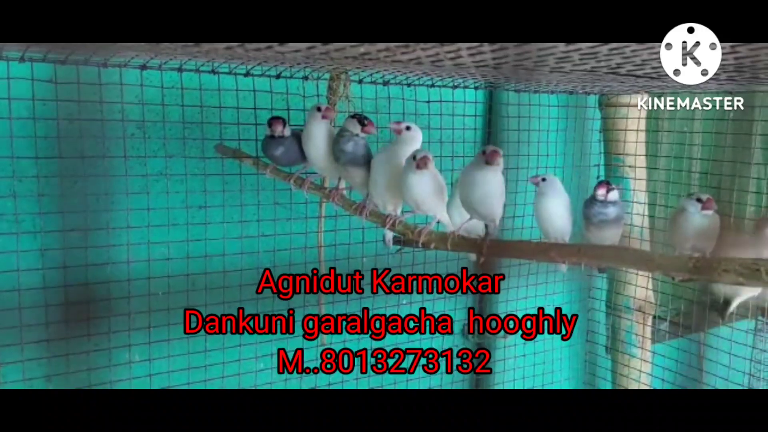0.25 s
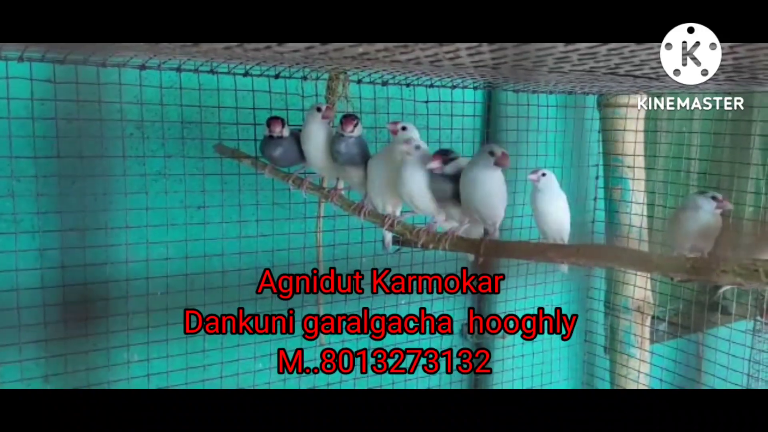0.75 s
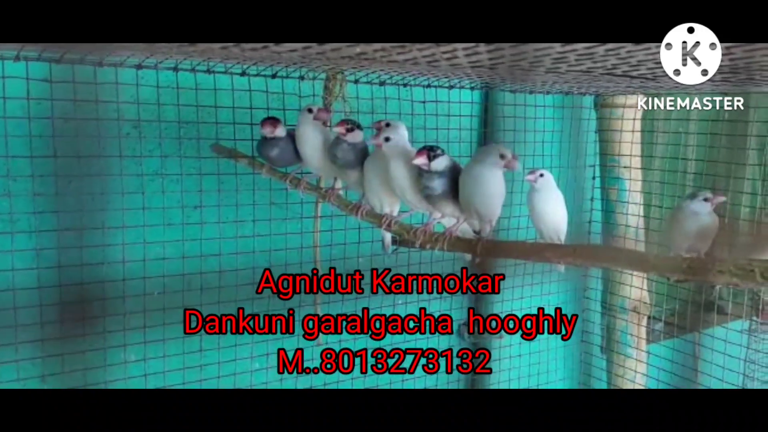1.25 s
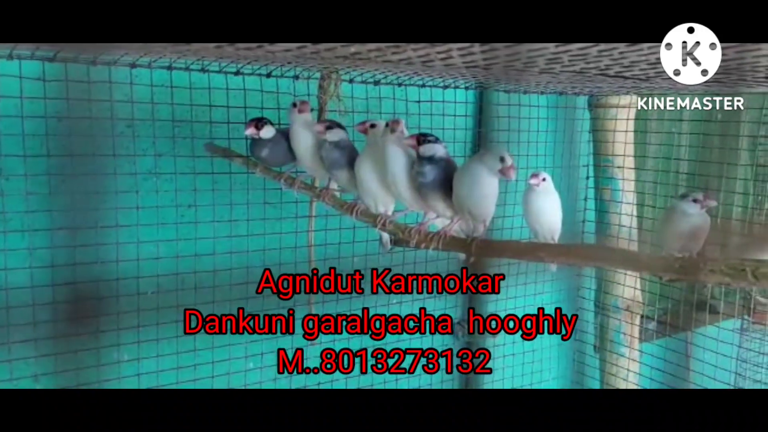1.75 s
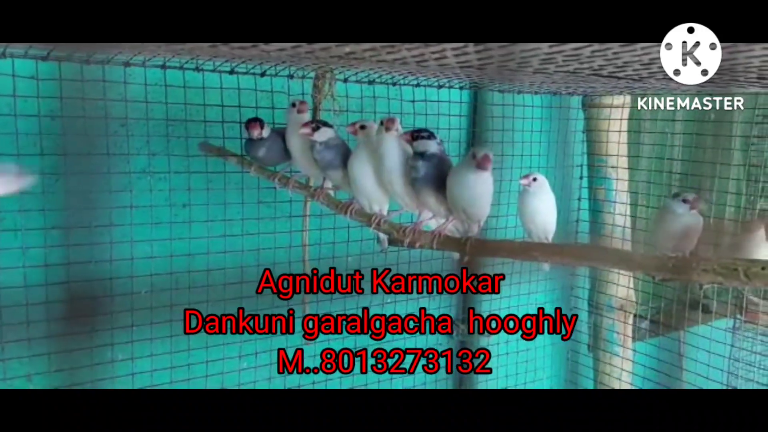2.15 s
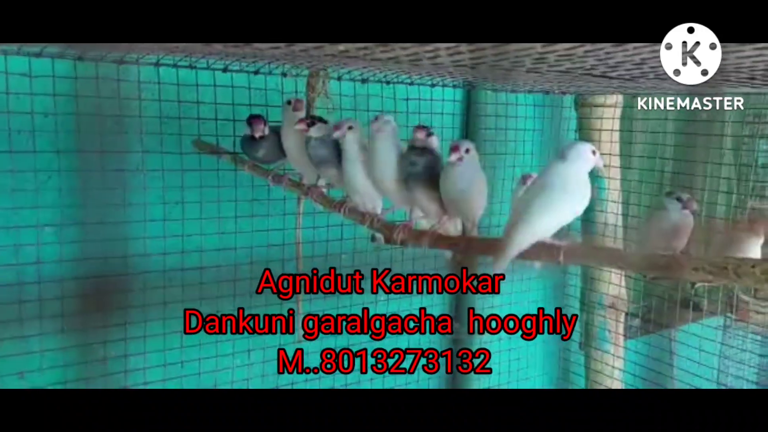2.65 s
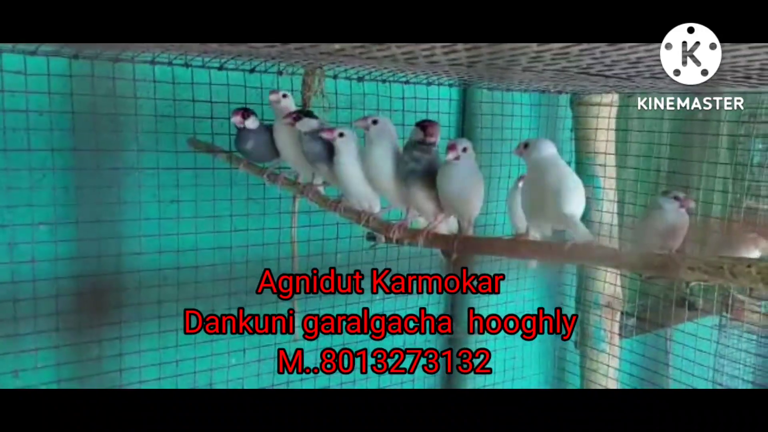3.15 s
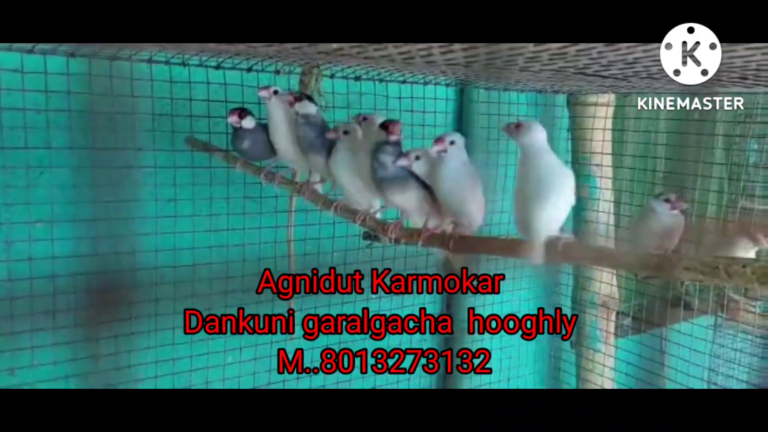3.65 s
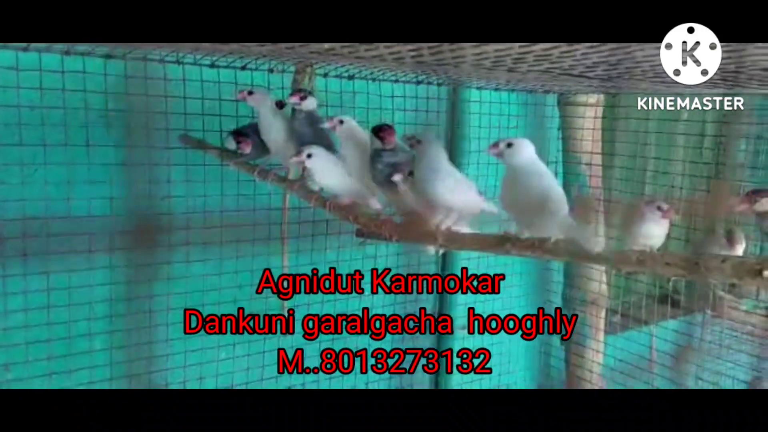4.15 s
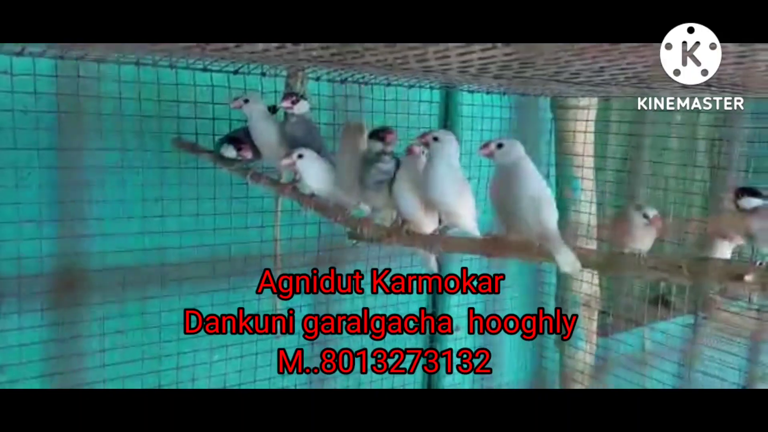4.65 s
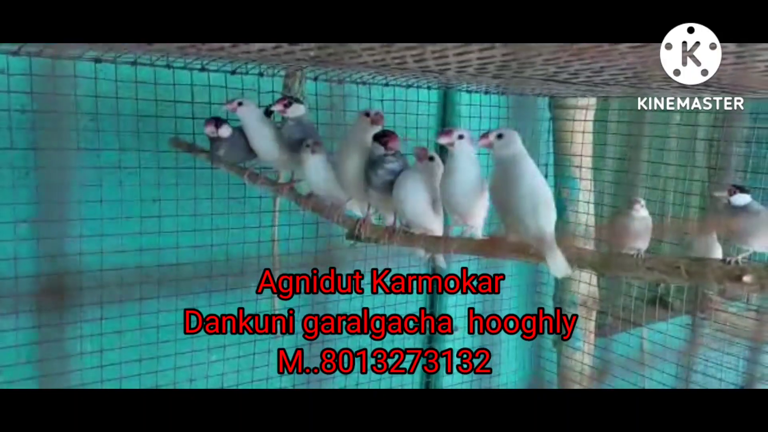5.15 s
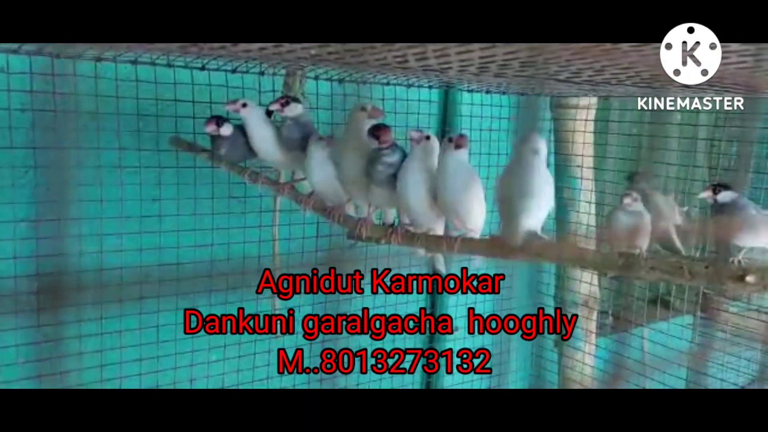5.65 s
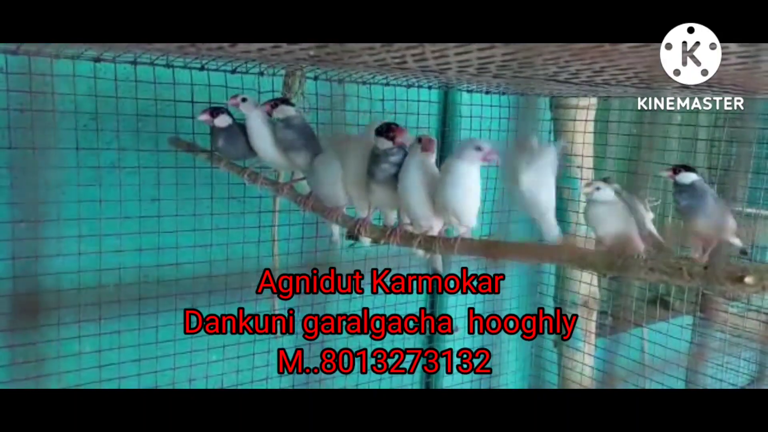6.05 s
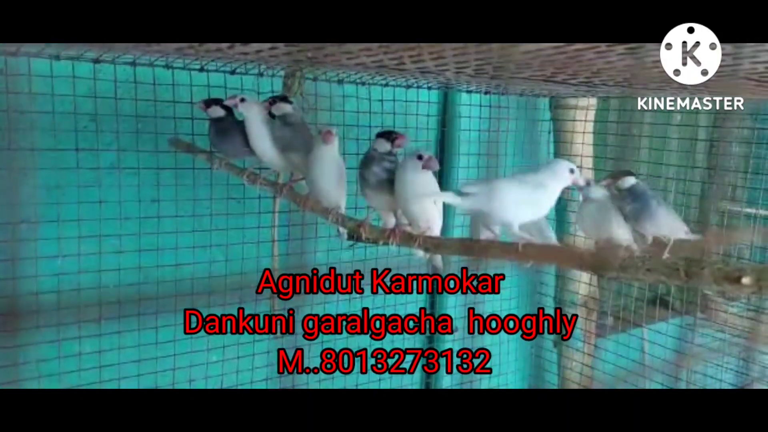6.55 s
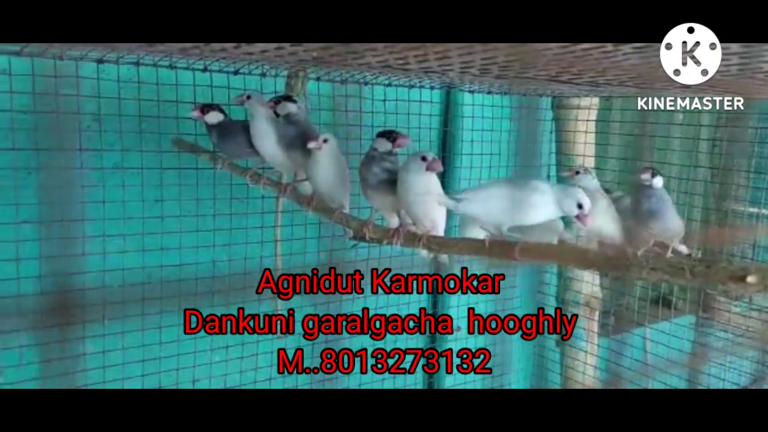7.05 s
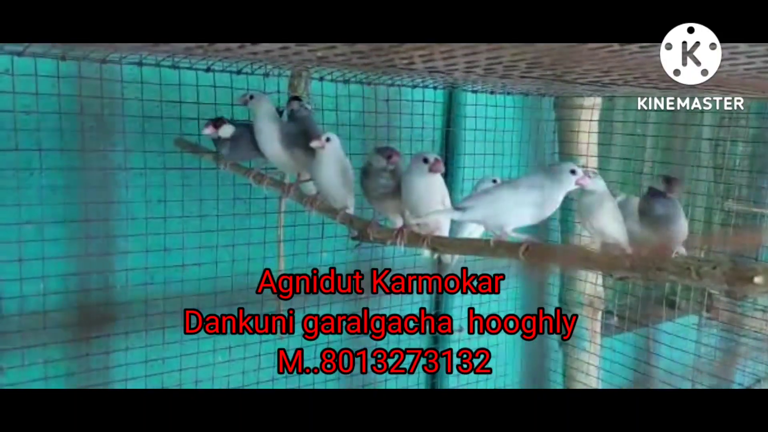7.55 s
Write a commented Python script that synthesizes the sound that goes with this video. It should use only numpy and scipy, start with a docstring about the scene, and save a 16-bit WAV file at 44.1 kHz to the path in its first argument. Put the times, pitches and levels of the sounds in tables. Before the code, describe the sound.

A hoarse rising bird whistle rings out, then many quick chips, ticks, raspy scolds and soft wingbeats fill a small cage over faint hum.

```python
"""A loud rising whistle rings out at once, over a faint low hum, in a small wire aviary full of finches.
Many short chips follow, with low voice ticks, wing flutters, nasal calls, whistles and raspy scolding.
The voices are stacks of overtones, coloured by a beak and shaken to sound rough.
Wing beats are soft low tones; feet, feathers and the farther flock are shaped noise.
Near walls answer every call."""
import sys
import numpy as np
from scipy import signal
from scipy.fft import rfft, irfft, next_fast_len
from scipy.io import wavfile
from scipy.ndimage import uniform_filter1d, map_coordinates

SR = 44100
rng = np.random.default_rng(int(sys.argv[2]) if len(sys.argv) > 2 else 0)


def persist_wave(psi):
    """Save psi, clipped to +-1, as 16-bit WAV."""
    counts = np.round(np.clip(psi, -1, 1) * 32767).astype(np.int16)
    wavfile.write(sys.argv[1], SR, np.atleast_2d(counts).T)


N = 343980  # length of the scene in samples
TOP_HZ = 15500  # nothing sounds above this


def amp(db):
    """Decibels to gain."""
    return 10 ** (np.asarray(db) / 20)


def unit(x):
    """Scale x to an rms (average strength) of 1."""
    return x / np.sqrt(np.mean(x ** 2) + 1e-20)


def along(points, hz):
    """Read a curve given as (f/Hz, value) points, joined by lines on a log frequency axis."""
    f, v = np.transpose(points)
    return np.interp(np.log(hz + 1), np.log(f + 1), v)


def wobble(rate, size):
    """A smooth random curve through `rate` random points a second."""
    knots = rng.standard_normal(4096)
    return map_coordinates(knots, [np.arange(size) * rate / SR], mode="wrap")


def trill(rate, size):
    """A swing between -1 and 1 at a slightly unsteady rate."""
    unsteady_rate = rate * (1 + .2 * wobble(rate, size))
    return np.sin(2 * np.pi * np.cumsum(unsteady_rate) / SR)


def filtered(x, response):
    """Make each frequency of x stronger or weaker, as response(hz) says."""
    m = next_fast_len(N + 8192)
    hz = np.fft.rfftfreq(m, 1 / SR)
    return irfft(rfft(x, m) * response(hz), m)[..., :N]


def noise(spectrum, side_db):
    """Stereo noise of rms 1; side_db sets how much left and right differ."""
    mid, side = filtered(rng.standard_normal((2, N)), lambda hz: amp(along(spectrum, hz)))
    side = amp(side_db) * side
    return unit(np.array([mid + side, mid - side]))


def patchy(x, depth_db):
    """Small patches of pitch and time swell and fade independently."""
    z = signal.stft(x, nperseg=256)[2]
    field = rng.standard_normal(z.shape[1:])
    field = uniform_filter1d(field, size=4, axis=0)
    field = uniform_filter1d(field, size=14, axis=1)
    patched = signal.istft(z * amp(depth_db * unit(field)), nperseg=256)[1]
    return unit(patched[:, :N])


def add(out, s, x, pan_db, lag_s=0):
    """Place a sound at s seconds; pan_db is left over right level, lag_s delays the right side."""
    gains = unit(amp([pan_db / 2, -pan_db / 2]))
    for channel, gain, delay in zip(out, gains, (0, lag_s)):
        start = max(int((s + delay) * SR), 0)
        part = channel[start:start + len(x)]
        part += gain * x[:len(part)]


def syrinx(pitch, rough, beak, jitter, flutter_db, jitter_hz, count):
    """Bird voice box: overtones shaped by throat and beak, near rms 1; roughness shakes pitch and strength."""
    size = len(pitch)
    shaken_pitch = pitch * (1 + jitter * rough * wobble(jitter_hz, size))
    phase = 2 * np.pi * np.cumsum(shaken_pitch) / SR
    k = np.arange(1, count + 1)[:, None]
    gains = amp(along(beak, k * pitch)) * (k * pitch < TOP_HZ)
    strength = np.sqrt((gains ** 2).sum(0) / 2 + 1e-12)
    tone = (gains * np.sin(k * phase)).sum(0) / strength
    return tone * unit(amp(flutter_db * rough * wobble(jitter_hz, size)))


# how loud the whole background is over time: (t/s, level/dB)
BACKGROUND_LEVEL = [(0, -49.5), (1.4, -53.5), (2.05, -41), (2.9, -55), (4.1, -42.5), (5.25, -46.5),
                    (6.1, -40.5), (7.8, -40)]
REFERENCE_DB = -50  # the background level at which the swell is 0 dB


def swell(s):
    """How many dB the background is above its reference level at s seconds."""
    return np.interp(s, *np.transpose(BACKGROUND_LEVEL)) - REFERENCE_DB


# tone colour of the hum: (f/Hz, level/dB)
HUM_COLOUR = [(25, -13), (90, 2), (180, -3.5), (260, -0.5), (350, -9.5), (900, -21.5), (2000, -52)]
# wavering tones in the hum, relative to its noise: (f/Hz, level/dB)
DRONE_TONES = [(87, -3.5), (146, -6)]
# tone colour of the farther flock: (f/Hz, level/dB)
FLOCK_COLOUR = [(500, -11.5), (1150, -3), (2400, 3.5), (3500, -6.5), (5000, -10), (8000, -19.5),
                (15000, -23.5)]
# tone colour of rustling feathers: (f/Hz, level/dB)
RUSTLE_COLOUR = [(400, -15), (7000, -8), (12500, 12), (15500, -63)]
HUM_DB, FLOCK_DB, RUSTLE_DB = -52.5, -50.5, -67.5  # levels at 0 dB swell
HUM_GROWS, RUSTLE_GROWS = 0.79, 0.96  # dB for each dB of swell


def background():
    """Low hum with wavering tones, blur of the farther flock and rustling feathers rise and fall together."""
    t = np.arange(N) / SR
    swell_db = swell(t)
    drone = np.zeros(N)
    for hz, db in DRONE_TONES:
        level = amp(db + 5.5 * wobble(30, N))
        drone += level * np.sin(2 * np.pi * hz * t + 0.84 * wobble(15, N))
    hum = amp(HUM_DB + HUM_GROWS * swell_db) * (noise(HUM_COLOUR, side_db=-11.0) + drone)
    flock = amp(FLOCK_DB + swell_db) * patchy(noise(FLOCK_COLOUR, side_db=-1), depth_db=4)
    rustle_db = RUSTLE_DB + RUSTLE_GROWS * swell_db
    rustle_db = rustle_db + 3.3 * wobble(26, N) + 1.6 * wobble(120, N)
    return hum + flock + amp(rustle_db) * noise(RUSTLE_COLOUR, side_db=2.0)


LOUD_LOW_HZ, LOUD_TOP_HZ = 1466, 3292  # the upward slide
SLIDE_BEND = .36  # softness of the slide, as a share of the time to mid-slide
CREST_S, SAG_HZ_PER_S = .145, 1750  # after the crest the pitch sinks steadily
TREMOR, TREMOR_PER_S = .024, 110  # trill that calms towards the end: share of the pitch, swings a second
HOOK_S, HOOK_HZ = .005, 700  # at the very end the pitch drops and the voice breaks up again
LOUD_RISE_DB, LOUD_FADE_DB_PER_S = 9, 24.5  # rise from the start to the peak, then fade
LOUD_PEAK_AT = 1.48  # when the level peaks, in mid-slide times
HOARSE, CLEAR = 0.678, 0.11  # roughness 0-1 at the foot and at the top of the slide
SECOND_TOP_HZ, SECOND_DB = 5440, -9.5  # second voice: pitch ceiling, level against the first at mid-slide
MELLOW_HZ = 5200  # towards the end the overtones above this die away
ONSET_S = 0.041  # soft start
# loud calls: (t/s, length/s, time to mid-slide/s, level/dB before a shared trim, extra treble/dB)
LOUD_CALLS = [(0.005, .308, .066, -10, 1), (2.185, .325, .054, -10.5, 5)]
# tone colour of the beak in loud calls: (f/Hz, level/dB)
LOUD_CALL_BEAK = [(1400, -5), (2200, -1.5), (3100, 8.5), (4300, 1), (5300, -4), (6000, -12), (9600, -23),
                  (13000, -27.5), (16000, -44)]


def loud_calls():
    """Two hoarse voices slide up together; the lower clears into a trilling whistle and hooks downward."""
    out = np.zeros((2, N))
    for s, length, slide_s, peak_db, treble_db in LOUD_CALLS:
        t = np.arange(int(length * SR)) / SR
        risen = 1 / (1 + np.exp((1 - t / slide_s) / SLIDE_BEND))  # 0 at the foot, 1 at the top
        hz = LOUD_LOW_HZ + (LOUD_TOP_HZ - LOUD_LOW_HZ) * risen
        hz = hz - SAG_HZ_PER_S * np.maximum(t - CREST_S, 0)
        hz = hz * (1 + TREMOR * (1 - (t / length) ** 2) * trill(TREMOR_PER_S, len(t)))
        hook = np.exp((t - length) / HOOK_S)
        peak_s = LOUD_PEAK_AT * slide_s
        below_db = LOUD_RISE_DB * (1 - t / peak_s)
        fade_db = LOUD_FADE_DB_PER_S * (t - peak_s)
        db = peak_db - np.maximum(below_db, fade_db)
        rough = HOARSE + (CLEAR - HOARSE) * risen ** 2 * (1 - hook)
        beak = [(f, level + treble_db * (f > 7000)) for f, level in LOUD_CALL_BEAK]
        first = syrinx(hz - HOOK_HZ * hook, rough, beak, jitter=.105, flutter_db=6, jitter_hz=950, count=7)
        # the second voice starts an octave up and gives out as the first one clears
        second_hz = np.minimum(2 * hz, SECOND_TOP_HZ)
        second = syrinx(second_hz, rough, beak, jitter=.06, flutter_db=8, jitter_hz=700, count=1)
        second_share = 4 * risen * (1 - risen)
        call = first + second_share * second * amp(SECOND_DB)
        mellow = signal.sosfiltfilt(signal.butter(2, MELLOW_HZ, fs=SR, output='sos'), call)
        call = call + (mellow - call) * (t / length) ** 3
        gate = np.minimum(t / ONSET_S, 1) * (1 - hook)
        add(out, s, call * amp(db - 2.0) * gate, pan_db=-5.5, lag_s=.0001)
    return out


def chip(top_hz, beak, rise, bend_s, attack_s, decay_s, rough=0.37):
    """One chip: the pitch flicks up and levels off as the level peaks; no two are equally long."""
    t = np.arange(-SR // 50, SR // 25) / SR
    t = t * np.exp(0.1 * rng.normal())  # random stretch of all the times below
    flick = 1 / (1 + np.exp(np.clip((t + 0.00409) / bend_s, -30, 30)))
    pitch = top_hz * (1.03 - rise * flick)
    envelope = np.exp(-np.abs(t / np.where(t < 0, attack_s, decay_s)) ** 4.3)
    return envelope * syrinx(pitch, rough, beak, jitter=.11, flutter_db=4.5, jitter_hz=1200, count=6)


# overtone colour of a chip: (multiple of the top pitch, level/dB)
CHIP_COLOUR = [(1.6, 13.5), (2.1, -2), (3, -18.5), (4, -32.5)]


def chip_beak(top_hz, fundamental_db):
    """Colour of a chip: the octave region leads, and the fundamental is muted more or less."""
    return [(0.9 * top_hz, fundamental_db)] + [(k * top_hz, db) for k, db in CHIP_COLOUR]


# tone colour of a voice tick: (f/Hz, level/dB)
TICK_BEAK = [(700, 23), (1200, 14.5), (3000, 18), (5000, -7), (12000, -14)]


def tut():
    """A tick of the voice: a steep slide from low down that stops short."""
    return chip(1600, TICK_BEAK, rise=.55, bend_s=0.00352, attack_s=0.0093, decay_s=0.002)


FAR_DB = -50.5  # faintest far chips at 0 dB swell


def far_birds():
    """Faint chips and ticks from the back of the cage, rising and falling with the background."""
    out = np.zeros((2, N))
    for when, pitch, size, side, kind in rng.random((170, 5)):
        s, hz = when * N / SR, 1150 + 750 * pitch
        if kind < 2 / 3:
            beak = chip_beak(hz, fundamental_db=-12 * side)
            call = chip(hz, beak, rise=0.2, bend_s=0.0041, attack_s=0.0025, decay_s=0.011)
        else:
            call = .5 * tut()
        db = FAR_DB + swell(s) + 8 * size
        add(out, s, amp(db) * call, 10 * (side - .6), lag_s=0.00046 * rng.random())
    return out


SHUFFLE_DB = -74.5  # softest shuffle at 0 dB swell, on the same scale as the taps
# feet on perch and mesh: (t/s, level/dB before a shared boost and tone colour)
FOOT_TAPS = [(3.264, -62), (5.009, -57), (6.153, -45), (7.062, -51.5)]


def feet():
    """Claws tick as dry bursts of noise; lighter shuffles rise and fall with the background."""
    out = np.zeros((2, N))
    t = np.arange(SR // 20) / SR
    steps = list(FOOT_TAPS)
    for when, size in rng.random((70, 2)):
        s = when * N / SR
        steps.append((s, SHUFFLE_DB + swell(s) + 16 * size))
    for s, db in steps:
        fade = amp(db + 9.5 - 60 * t / 0.057)  # falls 60 dB in 57 ms
        tick = fade * np.minimum(t / .002, 1) * rng.standard_normal(len(t))
        add(out, s, tick, rng.normal(0, 16.0))
    colour = [(100, 5.0), (650, 18.0), (3000, 2.0), (14000, 2)]  # (f/Hz, level/dB)
    return filtered(out, lambda hz: amp(along(colour, hz)))


CHIP_RISE, CHIP_RISE_ROUGH = .15, 0.32  # upward flick as a share of the pitch; extra per unit of roughness
CHIP_ROUGH = .22  # roughness 0-1 of a clean chip
RASP_FROM_DB, RASP_PER_DB = -31, .085  # a hard-driven fundamental breaks into a rasp
MUTE_BELOW_HZ, MUTE_DB_PER_HZ, MUTE_MOST_DB = 1773, 0.18, -26  # the beak mutes low fundamentals
# short contact chips: (t/s, top f/Hz, level/dB before a shared trim, left over right/dB)
CONTACT_CHIPS = [(.457, 2060, -26, -4), (.624, 1760, -37.5, -9), (0.76, 1683, -19.5, 3),
                 (.876, 1997, -30.5, -9), (0.968, 1597, -29.5, -10), (1.21, 1304, -28, -10),
                 (1.257, 1760, -28.5, -9), (1.328, 2054, -27.5, 4.5), (1.517, 1752, -31, 17),
                 (1.565, 1763, -29, -18), (1.703, 1558, -19, 5.5), (1.771, 1316, -26, -12),
                 (1.843, 1906, -21, 9), (1.988, 1764, -20.5, 0), (2.02, 1534, -15.5, 13),
                 (2.062, 1670, -20, -10), (2.637, 1635, -20.5, 5), (2.659, 1650, -25.5, -19),
                 (2.777, 1585, -27.5, 0.5), (2.809, 1572, -23.5, 19), (2.846, 1830, -25, 5),
                 (3.023, 1602, -19.5, 12), (3.093, 1780, -29.5, 35), (3.322, 1824, -30.5, 29),
                 (3.475, 1570, -32.5, -14), (3.93, 1620, -22.5, -16), (4.071, 1610, -21.5, -14),
                 (4.088, 2026, -19.5, -5), (4.532, 1790, -21, 20), (4.546, 1960, -16, -9),
                 (4.731, 1113, -28.5, -1), (4.938, 1730, -20.5, 31), (5.142, 1864, -24.5, 23),
                 (5.325, 1632, -16.5, 16), (5.645, 1691, -12, 9), (5.742, 1763, -26.5, -22),
                 (5.791, 1730, -19.5, 11), (5.875, 1716, -21, -16), (5.91, 1580, -14.5, 6),
                 (6.012, 2153, -25, -12), (6.126, 1528, -17, 7), (6.315, 1610, -15.5, 2),
                 (6.429, 1860, -18.5, 16), (6.589, 1437, -23, -16), (6.789, 1180, -21.5, -10),
                 (6.901, 1720, -23.5, -14), (7.128, 1617, -22.5, -18), (7.198, 1260, -25.5, -8),
                 (7.297, 1254, -26.5, 0), (7.734, 1644, -26.5, -19)]


def chips():
    """Near birds chip from all along the perch; louder fundamentals sound raspier."""
    out = np.zeros((2, N))
    for s, hz, db, pan_db in CONTACT_CHIPS:
        fundamental_db = np.clip(MUTE_DB_PER_HZ * (hz - MUTE_BELOW_HZ), MUTE_MOST_DB, 2)
        drive_db = db + fundamental_db - RASP_FROM_DB
        rough = np.clip(CHIP_ROUGH + RASP_PER_DB * drive_db, CHIP_ROUGH, .55)
        rise = (CHIP_RISE + CHIP_RISE_ROUGH * rough) * rng.uniform(0.54, 1.2)
        call = chip(hz, chip_beak(hz, fundamental_db), rise, bend_s=0.00253,
                    attack_s=0.0059, decay_s=0.0062 * (1 + rough), rough=rough)
        # a chip peaks 1/50 s in, so it starts that much early
        add(out, s - 1 / 50, amp(db - 5.0) * call, pan_db, lag_s=0.00036 * (pan_db > 0))
    return out


TICK_GAP_S = .0432  # time between ticks in a run
# quick upward voice ticks, alone or in runs: (t/s, number of ticks, level/dB)
TICK_RUNS = [(1.121, 1, -37), (2.697, 1, -35), (3.515, 1, -36), (4.298, 5, -31.5), (4.59, 1, -34),
             (5.267, 1, -39), (5.953, 1, -31), (6.04, 2, -32)]


def tuts():
    """Steep, low ticks of the voice, singly or in a quick run."""
    out = np.zeros((2, N))
    for first, count, db in TICK_RUNS:
        for s in first + TICK_GAP_S * np.arange(count):
            add(out, s - 1 / 50, amp(db) * tut(), pan_db=2.0, lag_s=0.0001)
    return out


BEATS_PER_S = 14
BOUT_TAPER_DB = 4.5  # beats weaken by up to this towards both ends of a bout
# bouts of wing beats: (t/s, length/s, level/dB)
WING_BOUTS = [(1.688, .43, -34.5), (2.768, .9, -36.5), (5.51, .18, -35), (6.554, .39, -33)]


def wings():
    """Each wing beat is a soft, low whirr; a bird passing close pushes a puff of air."""
    out = np.zeros((2, N))
    t = np.arange(-SR // 20, SR // 20) / SR
    for first, length, db in WING_BOUTS:
        beats = np.arange(first, first + length, 1 / BEATS_PER_S)
        places = np.linspace(-1, 1, len(beats) + 2)[1:-1]  # 0 is the middle of the bout
        for s, place in zip(beats, places):
            pitch = 272 * (1 + 0.1 * wobble(96.0, len(t)))
            whirr = np.sin(2 * np.pi * np.cumsum(pitch) / SR) * np.exp(-(t / 0.025) ** 2)
            add(out, s - 1 / 20, amp(db - BOUT_TAPER_DB * place ** 2) * whirr, pan_db=3.0)
    puff = np.exp(-((np.arange(N) / SR - 2.45) / 0.038) ** 2)
    air = noise([(50, -5.0), (600, -23), (2000, -34)], side_db=-4)
    return out + amp(-41.5) * puff * air


NASAL_WAVER = .006  # pitch waver as a share, before roughness widens it
NASAL_BOW = .025  # the pitch bows upward by this share in the middle
# nasal calls: (t/s, length/s, middle f/Hz, starting level/dB, roughness 0-1)
NASAL_CALLS = [(1.711, 0.32, 640.5, -39, 0.19), (3.533, 0.24, 670.6, -44.5, 0.09),
               (6.852, 0.199, 564.7, -35, .55)]
# tone colour of the beak in nasal calls: (f/Hz, level/dB)
NASAL_COLOUR = [(600, -7), (1400, 2.5), (4000, 14), (5500, 3), (7500, -14.5), (12000, -14)]


def nasal_calls():
    """Low-pitched stacks of many harmonics that bow, waver and fade."""
    out = np.zeros((2, N))
    for s, length, hz, db, rough in NASAL_CALLS:
        u = np.linspace(0, 1, int(length * SR))  # share of the call gone by
        bow = NASAL_BOW * (2 * u - 1) ** 2
        waver = NASAL_WAVER * (1 + 4 * rough) * wobble(45, len(u))
        pitch = hz * (1 - bow + waver)
        call = syrinx(pitch, rough, NASAL_COLOUR, jitter=.04, flutter_db=8, jitter_hz=400, count=18)
        level = amp(db - 12.0 * u) * amp(3 * wobble(60, len(u)))
        add(out, s, level * call * signal.windows.tukey(len(u), .5), pan_db=-5)
    return out


def whistle(pitch, rough, taper):
    """A nearly pure note; the beak follows the pitch and mutes the overtone."""
    size = len(pitch)
    shaken_pitch = pitch * (1 + 0.127 * rough * wobble(800, size))
    phase = 2 * np.pi * np.cumsum(shaken_pitch) / SR
    tone = np.sin(phase) + amp(-28.5) * np.sin(2 * phase)
    shaken = unit(tone * amp(7.9 * rough * wobble(402.7, size)))
    return shaken * signal.windows.tukey(size, taper)


# whistles: (t/s, length/s, start f/Hz, end f/Hz, level/dB before a shared trim, roughness 0-1)
WHISTLE_NOTES = [(2.176, .021, 5300, 3300, -33, .5), (5.097, .04, 4300, 2390, -38, 0.4),
                 (5.347, .052, 3100, 2146, -27.5, .25), (5.504, 0.088, 3700, 3913, -24.5, 0.1),
                 (5.793, 0.094, 3290, 3650, -25.5, 0.12), (7.397, 0.037, 3150, 2000, -26.5, 0.36),
                 (7.543, 0.0256, 3040, 2750, -25.5, 0.16), (7.563, 0.079, 3724, 3917, -22.5, 0.07),
                 (7.707, 0.024, 3020, 2570, -27.5, .3)]
# high arched calls that collapse into a rasp: (t/s, length/s, level/dB before shape and trim)
ARCHED_CALLS = [(5.682, .13, -28), (6.052, .16, -29), (6.551, .25, -28.5)]
# shape of an arched call: (share of the length, f/Hz, level/dB, roughness about 0-1)
ARCH_SHAPE = [(0, 5063, 13, 0.14), (.15, 5750, -0.5, .14), (.32, 5320, -3, 0.29), (.5, 3100, 0.5, .55),
              (1, 1956, -4, 1.02)]


def whistles():
    """Nearly pure notes: some glide up or down, and high arched calls roughen as they fall."""
    out = np.zeros((2, N))
    for s, length, start, end, db, rough in WHISTLE_NOTES:
        pitch = np.linspace(start, end, int(length * SR))
        add(out, s, amp(db - 4.0) * whistle(pitch, rough, taper=0.52), pan_db=1.0, lag_s=0.00029)
    share, *columns = np.transpose(ARCH_SHAPE)
    for s, length, db in ARCHED_CALLS:
        u = np.linspace(0, 1, int(length * SR))
        hz, shape_db, rough = (np.interp(u, share, column) for column in columns)
        add(out, s, amp(db + shape_db - 6) * whistle(hz, rough, taper=0.15), pan_db=18.0)
    return out


RASP_START_HZ, RASP_END_HZ, RASP_FADE_DB = 1074, 637, 8  # a rasp falls in pitch and fades
RASP_GRAINS_PER_S, RASP_GRAIN_DB = 130, 3  # speed and depth of the graininess
# scolding rasps: (t/s, length/s, starting level/dB)
SCOLDS = [(3.72, 0.12, -41), (3.868, .14, -35), (4.329, 0.061, -41), (4.661, 0.081, -34),
          (4.743, 0.052, -38), (4.874, 0.048, -44.5)]
# tone colour of the beak in a rasp: (f/Hz, level/dB)
RASP_COLOUR = [(700, -5.5), (3000, -2.5), (4100, 10), (5700, 1), (9000, -19), (14000, -25)]


def rasps():
    """Squabbling birds scold: a harsh, grainy stack that starts abruptly and falls."""
    out = np.zeros((2, N))
    for s, length, db in SCOLDS:
        u = np.linspace(0, 1, int(length * SR))
        pitch = RASP_START_HZ * (RASP_END_HZ / RASP_START_HZ) ** u
        call = syrinx(pitch, 1, RASP_COLOUR, jitter=.065, flutter_db=3, jitter_hz=800, count=18)
        grains = unit(amp(RASP_GRAIN_DB * wobble(RASP_GRAINS_PER_S, len(u))))
        level = amp(db - RASP_FADE_DB * u) * signal.windows.tukey(len(u), .2)
        add(out, s, level * call * grains, pan_db=-1)
    return out


# how long the walls ring: (f/Hz, time to fall by 60 dB/s)
WALL_RING = [(200, 0.95), (1500, 0.31), (3500, 0.27), (12000, 0.49)]


def aviary(x, early_db, tail_db):
    """A few close reflections from walls and roof, then a diffuse tail of fading noise."""
    hz, t, z = signal.stft(rng.standard_normal((2, SR // 2)), SR, nperseg=256)
    fade = amp(-60 * t / along(WALL_RING, hz)[:, None])
    tail = signal.istft(z * fade, SR, nperseg=256)[1]
    tail = np.pad(tail / np.linalg.norm(tail[0]), ((0, 0), (SR // 250, 0)))
    early = np.zeros_like(tail)
    for channel in early:
        places = rng.integers(SR // 400, SR // 45, size=8)
        channel[places] = rng.choice([-1, 1], size=8) / np.sqrt(8)
    source = x.sum(0)[None] / np.sqrt(2)
    echo = amp(early_db) * early + amp(tail_db) * tail
    return x + signal.fftconvolve(source, echo, axes=1)[:, :N]


def scene():
    """Near and farther birds in the aviary; the walls are heard most on the far birds."""
    loud = aviary(loud_calls(), early_db=-6, tail_db=-8)
    far = aviary(far_birds(), early_db=0, tail_db=0)
    short = aviary(chips() + tuts() + feet() + rasps(), early_db=-8.0, tail_db=-7.0)
    held = aviary(whistles() + nasal_calls(), early_db=-2.5, tail_db=-6.0)
    return background() + loud + far + short + held + wings()


def record(dry):
    """Nothing is kept above the band limit."""
    return filtered(dry, lambda hz: hz < TOP_HZ)


dry = scene()
out = record(dry)
persist_wave(out)
```